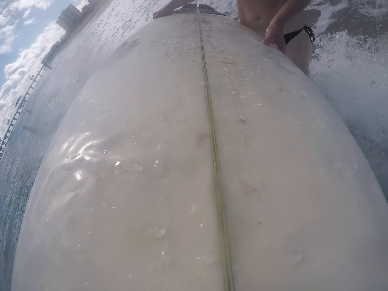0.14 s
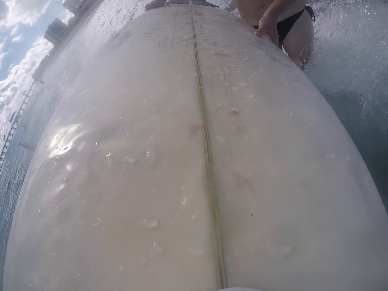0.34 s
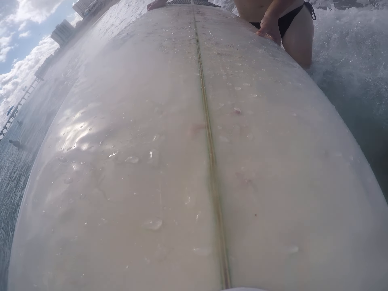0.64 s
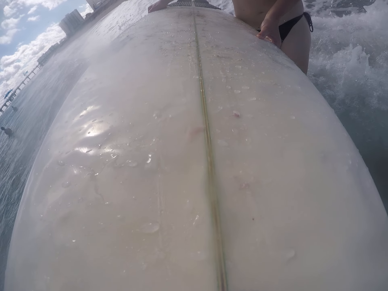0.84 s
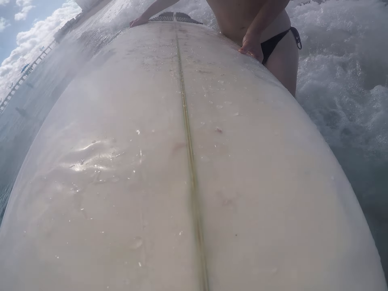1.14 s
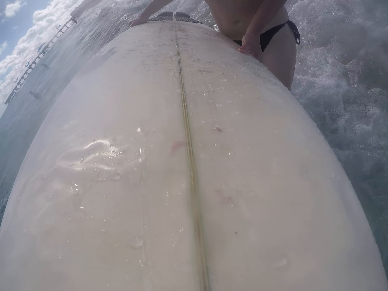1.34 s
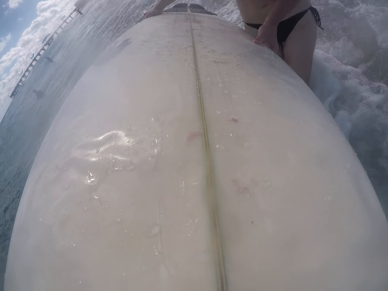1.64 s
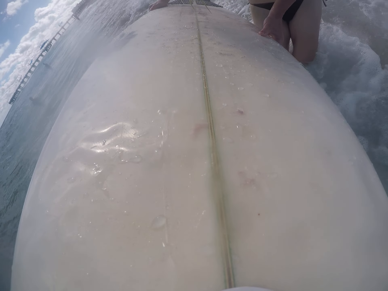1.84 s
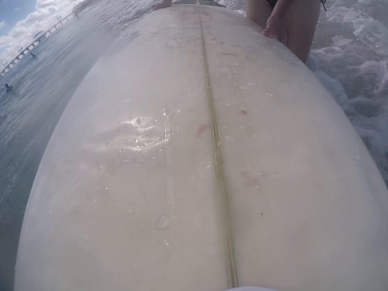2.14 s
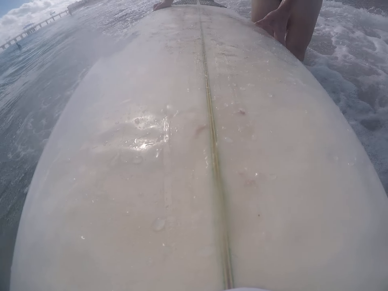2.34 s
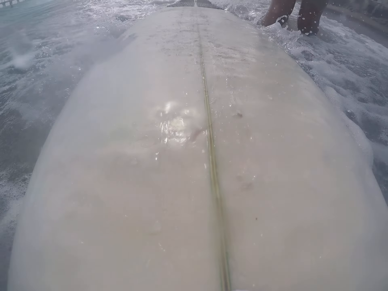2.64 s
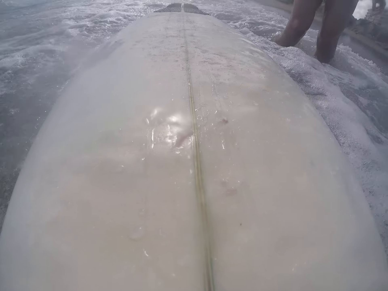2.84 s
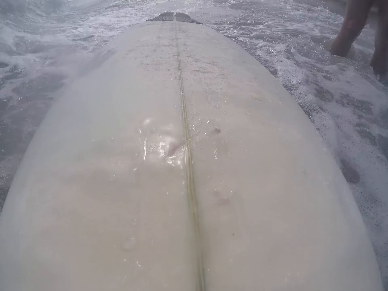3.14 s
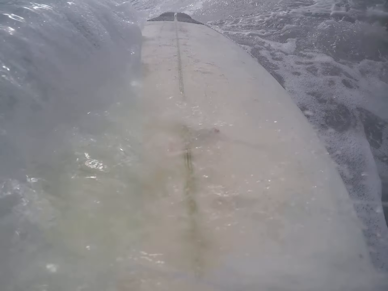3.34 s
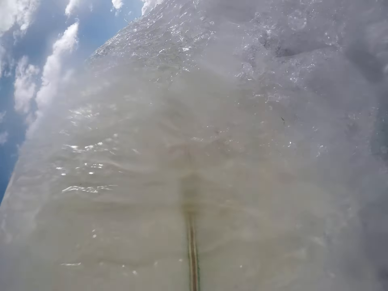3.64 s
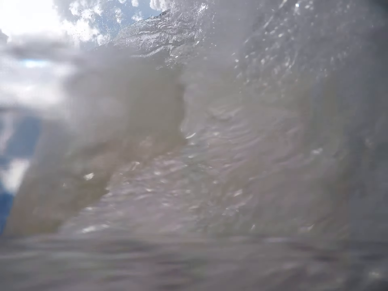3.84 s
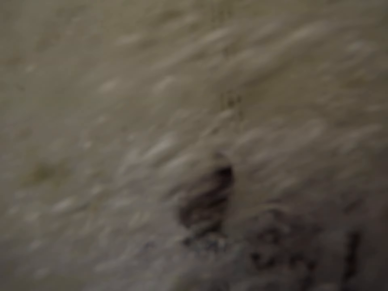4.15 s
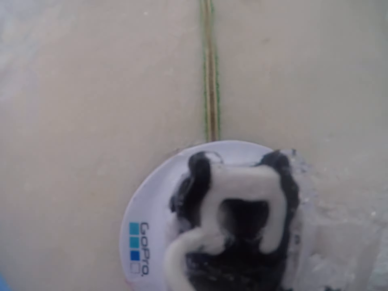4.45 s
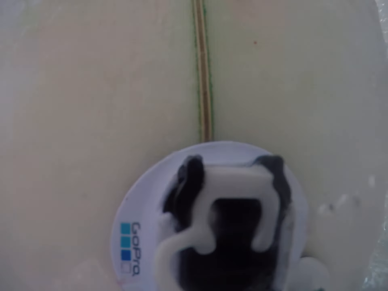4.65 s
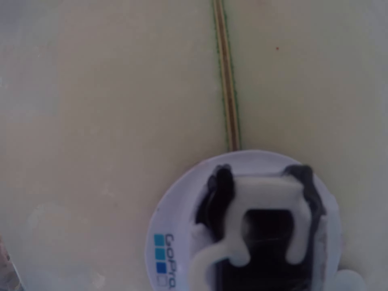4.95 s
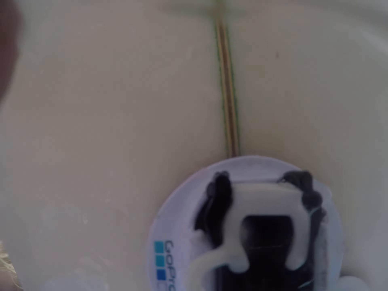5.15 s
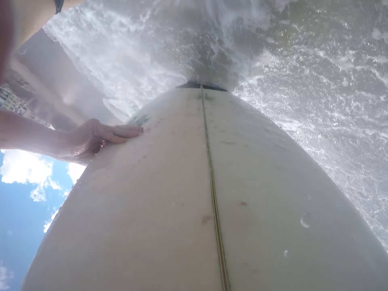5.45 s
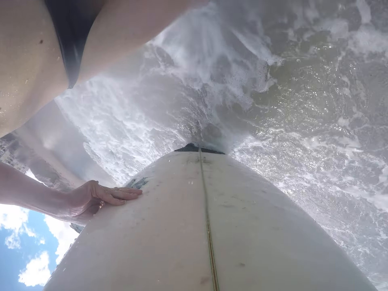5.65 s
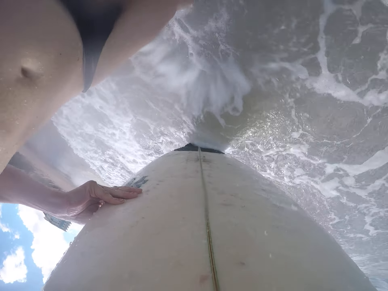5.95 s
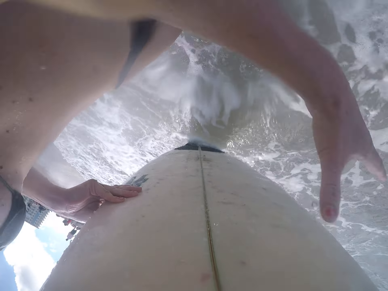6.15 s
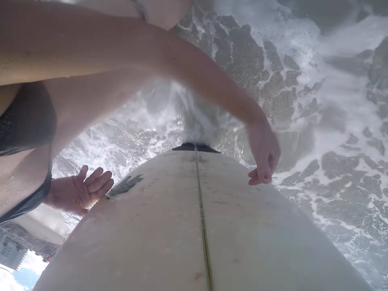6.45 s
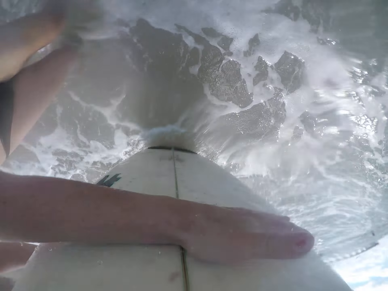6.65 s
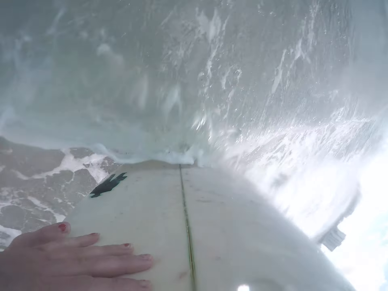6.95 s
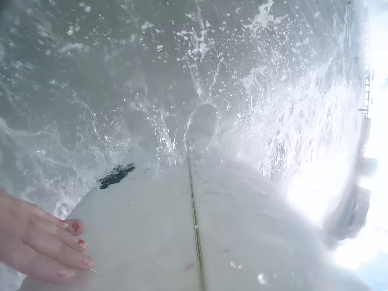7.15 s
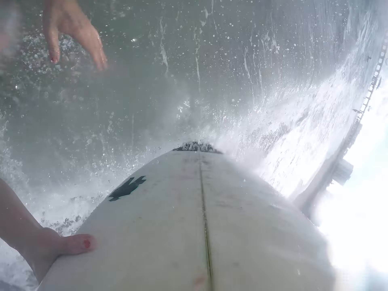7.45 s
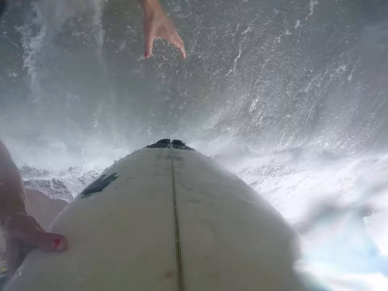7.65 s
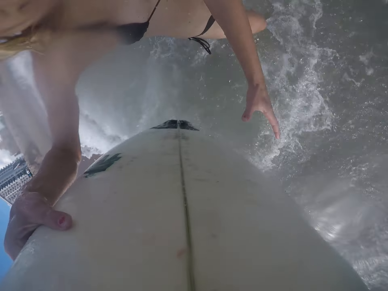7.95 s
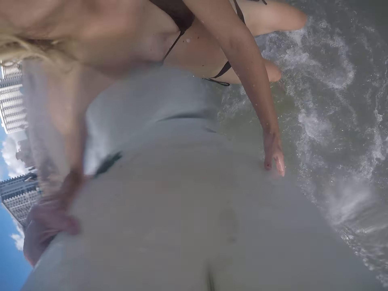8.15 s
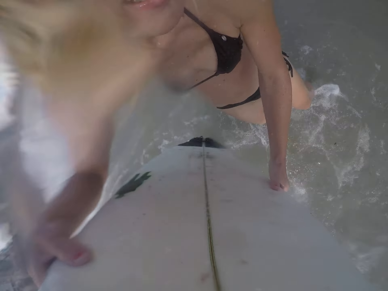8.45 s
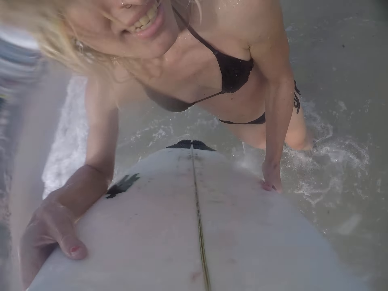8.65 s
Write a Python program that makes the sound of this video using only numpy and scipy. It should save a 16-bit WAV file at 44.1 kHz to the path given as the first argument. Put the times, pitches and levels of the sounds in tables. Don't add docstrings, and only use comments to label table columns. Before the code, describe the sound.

Close, muffled sound inside a sealed camera housing fixed to a surfboard in shore break. A broad roar fades within a second into low booming and sloshing. Water slaps the deck, then a heavy dunking thuds and gurgles. A rapid rocking rattle, short squeak and soft creak follow, then scrapes, hollow slaps, glugs and light ticking as hands hold the board upright.

```python
import sys
import numpy as np
from scipy import signal
from scipy.fft import rfft, irfft
from scipy.io import wavfile
from scipy.ndimage import uniform_filter1d, minimum_filter1d

SR = 44100
rng = np.random.default_rng(int(sys.argv[2]) if len(sys.argv) > 2 else 0)


def inscribe(sig):
    pcm = np.round(np.clip(np.atleast_2d(sig).T, -1, 1) * 32767)
    wavfile.write(sys.argv[1], SR, pcm.astype(np.int16))


def attenuation_scalar(level_db):
    decades = np.asarray(level_db, float) / 20
    return 10 ** decades


N = 387638

WETTED_S, LIFTED_S = 2.27, 5.7
# t/s, level/dB
ROAR_FADE = [
    (0, -9),
    (.25, -14.5),
    (.55, -21.5),
    (.85, -40),
    (1.1, -40.5),
    (1.25, -57.5),
    (1.5, -62),
]
# t/s, level/dB
LAPPING = [(0, -24.5), (.2, -28), (2.25, -34.5), (2.42, -37.5), (2.71, -43), (2.75, -54.5), (3.27, -50),
           (3.33, -30), (3.93, -33.5), (3.97, -41), (4.05, -30.5), (4.33, -32.5), (4.4, -47.5), (5.5, -46),
           (5.58, -47.5), (5.9, -43), (7.3, -34), (8.79, -36.5)]
# t/s, hold/s, scrape level/dB, hollow minus scrape level/dB
SURGES = [(2.28, 0.059, -19, 7.5), (2.497, 0.031, -13.5, 0.5), (2.56, 0.041, -14, 0.5),
          (2.628, 0.017, -26, -12), (2.654, 0.0066, -41, -19), (3.337, 0.0066, -7.5, 1),
          (3.424, 0.074, -25.5, -5), (3.793, 0.017, -22, 8), (3.847, 0.0095, -20.5, -11),
          (3.893, 0.033, -33, -16), (4.411, 0.57, -53.5, 16.5), (4.596, 0.21, -44.5, 12),
          (4.684, 0.038, -32.5, 10.5), (4.991, 0.018, -21.5, 6.5), (5.045, 0.0047, -14, -20),
          (5.066, 0.0069, -26, -1), (5.114, 0.039, -21, -19), (5.215, 0.089, -31, 4.5),
          (5.345, 0.17, -33.5, 1), (5.615, 0.0082, -29, 1), (2.721, 0.012, -47, 5.5),
          (2.329, 0.019, -30, 6)]
# t/s, hold/s, scrape level/dB, hollow minus scrape level/dB
GRABS = [(6.258, 0.043, -17.5, -17), (6.299, 0.029, -12.5, 1), (6.368, 0.079, -13, 1.5),
         (6.593, 0.0059, -27.5, 1.5), (6.625, 0.016, -12.5, -1), (6.749, 0.0094, -15, -2.5),
         (6.86, 0.087, -32, -1), (6.942, 0.12, -15.5, -12), (7.065, 0.039, -18, -4),
         (7.131, 0.054, -21, -6.5), (7.173, 0.03, -19.5, -22), (7.433, 0.14, -22.5, -2),
         (7.54, 0.21, -20.5, -0.5), (7.966, 0.037, -32.5, -6), (8.049, 0.19, -19.5, -11),
         (8.196, 0.035, -13.5, -4.5), (8.271, 0.23, -31, 2), (7.81, 0.071, -40, -5),
         (8.373, 0.028, -23.5, 7), (8.417, 0.031, -13.5, -5.5), (8.48, 0.059, -15.5, -1),
         (8.594, 0.013, -40, -2), (8.648, 0.021, -20, -5), (8.68, .11, -25.5, -5.5),
         (8.529, .04, -15.5, -18)]


def unit(x):
    return x / np.sqrt(np.mean(x ** 2))


def curves(rows):
    s, *columns = np.transpose(rows)
    return [np.interp(np.arange(N) / SR, s, c) for c in columns]


def band(x, lo_hz, hi_hz, order=2):
    return signal.sosfilt(signal.butter(order, [lo_hz, hi_hz], "band", fs=SR, output="sos"), x)


def ring(x, modes):
    return sum((-1) ** k * attenuation_scalar(db) * signal.lfilter(*signal.iirpeak(hz, hz / width, SR), x)
               for k, (hz, width, db) in enumerate(modes))


def restless_ring(x, modes, spread_db, rate):
    return sum((-1) ** k * ring(x * attenuation_scalar(spread_db * walk(rate)), [mode])
               for k, mode in enumerate(modes))


def colour(x, tone):
    hz, db = np.transpose(tone)
    bins_hz = np.arange(1, N // 2 + 2) * SR / N
    return unit(irfft(rfft(x) * attenuation_scalar(np.interp(np.log(bins_hz), np.log(hz), db)), N))


def walk(rate):
    k = int(SR / rate)
    held = np.repeat(rng.standard_normal(N // k + 1), k)
    return unit(uniform_filter1d(uniform_filter1d(held, k), k)[:N])


def grains(rate, spread_db):
    chance = rng.random((3, N))
    size = attenuation_scalar(-spread_db * np.log(1 - chance[1])) * np.sign(chance[2] - .5)
    return unit((chance[0] < rate / SR) * size)


def impulses(rows, gain_db=0):
    out = np.zeros(N)
    s, db = np.transpose(rows)
    out[(s * SR).astype(int)] = attenuation_scalar(db + gain_db)
    return out


def spurts(starts):
    t = np.arange(SR // 100) / SR
    push = (1 - np.exp(-t / 0.0014)) ** 2 * np.exp(-t / 0.00099)
    return rng.standard_normal(N) * signal.fftconvolve(starts, push)[:N]


def spells(rows, under_db, release_db_per_s):
    attack_s = 0.0056
    t, power = np.arange(SR) / SR, attenuation_scalar(2 * under_db) * np.ones(N)
    for s, hold, db in rows:
        drained_db = release_db_per_s * np.maximum(t - attack_s - hold, 0)
        shape = np.minimum(t / attack_s, 1) * attenuation_scalar(db - drained_db)
        at = int(s * SR)
        power[at:at + SR] += shape[:N - at] ** 2
    return 10 * np.log10(power)


def roar():
    # f/Hz, level/dB per Hz
    roar_tone = [(25, -6), (110, -9.5), (205, 0), (290, -12.5), (760, -5.5), (1150, -21), (2300, -31),
                 (11000, -70.5)]
    # f/Hz, level/dB per Hz
    spray_tone = [(880, -40), (1500, 0), (2440, -5), (3870, -8), (6330, -30), (9170, -28), (11900, -64),
                  (20200, -120)]
    # f/Hz, width/Hz, level/dB
    spray_rings = [(1710, 46, -8), (2420, 580, 3), (3300, 91, -19.5), (6550, 300, -18)]
    cavities = [(122, 47, -7.0), (210, 52, 0), (396, 23, 8.0), (434, 50, 6.5), (554, 74, 0.5), (779, 18, 5.0)]
    s = np.arange(N) / SR
    wide = colour(rng.standard_normal(N) * attenuation_scalar(2.5 * walk(30)), roar_tone)
    hollow = unit(ring(wide, cavities))
    wide = unit(0.6 * wide + 0.83 * hollow) * attenuation_scalar(curves(ROAR_FADE)[0]) * (s < ROAR_FADE[-1][0])

    spray = colour(rng.standard_normal(N), spray_tone)
    spray = unit(spray + 2.0 * ring(spray, spray_rings))
    spray = spray * (attenuation_scalar(-39.0 - 29.0 * s) + attenuation_scalar(-57.5)) * (s < WETTED_S)
    mist_db = np.where(s < WETTED_S, -62, -95 + 22.0 * np.clip((s - LIFTED_S) / 0.25, 0, 1))
    mist = unit(band(rng.standard_normal(N), 6200, 11500, order=3)) * attenuation_scalar(mist_db)
    return wide, spray + mist


def sway(hz, wander, flutter_db):
    phase = 2 * np.pi * np.cumsum(hz * (1 + wander * walk(14))) / SR
    return np.sqrt(2) * np.sin(phase) * attenuation_scalar(flutter_db * walk(26))


def board():
    # t/s, flex f/Hz, flex level/dB, stir of the sea level/dB
    bending = [(0.0, 30.5, -30, -34.5), (1.0, 28.4, -18.5, -34), (1.13, 27.63, -11.5, -29),
               (2.15, 27.26, -19, -27), (2.5, 27.94, -15, -13.5), (2.76, 27.7, -13, -37),
               (3.13, 27.86, -18.5, -45.5), (3.67, 28.13, -11, -17), (3.88, 24.7, -26, -13),
               (3.97, 21.9, -23.5, -25), (4.36, 24.83, -31.5, -21.5), (4.6, 38.6, -41, -41.5),
               (4.99, 39.66, -27.5, -16), (5.7, 26.34, -34, -36.5), (6.14, 26.7, -36.5, -38.5),
               (6.49, 29.2, -16.5, -18), (6.83, 25.02, -15, -18), (8.79, 27.01, -14.5, -18.5)]
    # t/s, f/Hz, peak level/dB, t60/s
    thumps = [(0.049, 174, -22.5, 0.92), (1.025, 111, -10.5, 0.1), (1.065, 118.4, -9.5, 0.41),
              (1.418, 115.6, -13, 0.26), (2.13, 117, -19, 0.24), (2.294, 183, -3, 1.03),
              (2.291, 487, -14.5, 0.23), (2.511, 158, -7.5, 0.29), (2.57, 122, -5.5, 0.24),
              (3.336, 98.4, -3, 0.094), (3.347, 189, -12, 0.13), (3.81, 91.5, 2, 0.058),
              (3.87, 192, 3, 0.043), (3.932, 97, -1.5, 0.041), (4.043, 91.7, -8.5, 0.23),
              (4.238, 79.6, 1.5, 0.057), (4.329, 99.7, -10, 0.36), (4.625, 126, -10, 0.51),
              (4.735, 130, -14.5, 0.83), (4.789, 91.7, -10.5, 0.42), (5.002, 99, -13, 0.37),
              (6.313, 111, -11, 1), (6.633, 103, -3.5, 0.14), (6.971, 115, -11, 0.18),
              (7.07, 159, -9, 0.17), (7.62, 118.7, -13.5, 1.06), (7.74, 118.4, -10.5, 0.74),
              (8.199, 94.2, -12.5, 0.66), (8.419, 153, -12, 0.2), (8.641, 112, -17, 1.1),
              (4.99, 67.2, -4, 0.27), (5.002, 42.7, -6, 0.53), (5.223, 62.5, -18.5, 0.31),
              (6.792, 67, -20, 0.39), (5.615, 58.3, -17, 0.26), (2.515, 69.4, -5, 0.15),
              (2.586, 69.3, -6.5, 0.29), (2.542, 110, -7, 0.09), (5.291, 59.1, -22, 0.23),
              (3.834, 79, 3, 0.063), (3.384, 190, -25, 0.11), (4.146, 90, -14, 0.18),
              (6.756, 65, -1.5, .15), (7.965, 123.6, -16.5, 0.87), (8.54, 117.4, -9, 0.36),
              (8.359, 137.9, -14.5, 0.25), (8.738, 72, -7.5, 0.59), (0.054, 199.7, -22.5, 2.2)]
    twist_hz, boom_hz, drum_hz = 54.86, 107.2, 183
    far_churn_db, surge_churn_db = -5.5, -8.5
    partner_ratio, partner_db = 1.13, -18.5
    s = np.arange(N) / SR
    flex_hz, flex_db, stir_db = curves(bending)
    afloat = s < LIFTED_S

    jolts = [(start, hold, db + surge_churn_db) for start, hold, db, _ in SURGES + GRABS]
    near_db = stir_db + np.where(afloat, -10.5, -27)
    under_db = np.where(s < WETTED_S, curves(LAPPING)[0] + far_churn_db, near_db)
    churn_db = spells(jolts, under_db, release_db_per_s=147.5)
    slosh = unit(band(rng.standard_normal(N), 33, 70)) * attenuation_scalar(4.0 * walk(9))
    stir = rng.standard_normal(N) * attenuation_scalar(3.04 * walk(12))
    upper = ring(stir, [(boom_hz, 14, 0), (drum_hz, 14, -5)])
    churn = unit(band(upper + attenuation_scalar(-15) * stir, 84, 234, order=3))

    flex = sway(flex_hz, wander=0.012, flutter_db=np.where(afloat, 1.1, 2.6))
    twist = sway(twist_hz, wander=0.1197, flutter_db=2.0)
    out = attenuation_scalar(flex_db) * flex + attenuation_scalar(churn_db) * churn
    out = out + attenuation_scalar(stir_db) * (0.63 * twist + 0.69 * slosh)
    for start, hz, db, t60 in thumps:
        at = int(start * SR)
        t = np.arange(min(SR, N - at)) / SR
        fade = (1 - np.exp(-t * hz / 0.27)) * np.exp(-np.log(1000) * t / t60)
        fade /= 1 + (t / 0.23) ** 6
        tone = np.sin(2 * np.pi * hz * t)
        tone = tone + attenuation_scalar(partner_db) * np.sin(2 * np.pi * partner_ratio * hz * t)
        out[at:at + len(t)] += attenuation_scalar(db) * fade * tone
    return out


def effort():
    # t/s, hold/s, level/dB
    shakes = [(2.3, 0.077, -47), (2.51, 0.13, -49.5), (3.33, 0.17, -44.5), (3.56, 0.4, -48.5),
              (3.8, 0.022, -37), (3.855, 0.065, -42), (3.98, 0.38, -51.5), (4.998, 0.012, -39.5),
              (5.04, 0.0084, -36), (5.068, 0.0085, -46), (5.12, 0.045, -38), (5.22, 0.077, -46.5),
              (5.3, 0.21, -58), (5.617, 0.012, -41.5), (6.26, 0.21, -48.5), (6.63, 0.042, -42),
              (6.75, 0.039, -53), (6.945, 0.21, -51.5), (7.07, 0.145, -67), (7.3, 0.12, -76),
              (7.42, 0.37, -54), (7.8, .3, -63), (8.1, 0.061, -56), (8.18, 0.091, -44.5),
              (8.38, 0.086, -47.5), (8.49, 0.1, -43), (8.69, 0.05, -68), (2.56, 0.096, -50),
              (8.772, .02, -36)]
    s, (lap_db,) = np.arange(N) / SR, curves(LAPPING)
    start, hold, db, hollow_db = np.transpose(SURGES + GRABS)
    deep_db = np.where(s < WETTED_S, 7.5, np.where(s < LIFTED_S, 1.5, -3))
    return (spells(zip(start, hold, db), lap_db, release_db_per_s=549.5),
            spells(zip(start, hold, db + hollow_db), lap_db + deep_db, release_db_per_s=404),
            spells(shakes, lap_db - 23.5, release_db_per_s=797))


def skin(force):
    # f/Hz, width/Hz, level/dB
    afloat_modes = [(383.4, 36.5, 0.5), (480, 91, -2.5), (560, 55, -3.5), (758, 78, -5), (925, 48, -6.5),
                    (1132, 84, 2.5), (1337, 53, -0.5)]
    # f/Hz, width/Hz, level/dB
    upright_modes = [(300, 30.6, 3.5), (483.4, 21.6, 4), (550, 105, -4.5), (800, 74, 1.5), (987, 93, 2),
                     (1228, 67, 5), (1333, 69, -1.5)]
    s = np.arange(N) / SR
    lifted = np.clip((s - LIFTED_S) / 0.095, 0, 1)
    load_db = np.where(s > WETTED_S, 1.8, 1.1)
    afloat = restless_ring(force, afloat_modes, load_db, 35)
    upright = restless_ring(force, upright_modes, load_db, 35)
    body = (1 - lifted) * afloat + lifted * upright + attenuation_scalar(-12.5) * force
    body = band(body, 180, 1570, order=3)
    body = signal.sosfilt(signal.cheby2(4, 30, 2100, fs=SR, output="sos"), body)
    return body + attenuation_scalar(-19 - 1.78 * lifted) * band(force, 1078.0, 1950.0)


def knocks():
    slips = np.diff(np.floor(np.cumsum(125 * attenuation_scalar(2.7 * walk(60))) / SR), prepend=0)
    return unit(spurts(slips * attenuation_scalar(4.9 * walk(300))))


def shell(force):
    # f/Hz, width/Hz, level/dB
    shell_modes = [(3020, 570, -4.5), (4500, 1100, 1), (6770, 2750, -2.5), (8420, 570, 5), (9900, 1500, -5),
                   (12500, 3000, -28.5)]
    body = restless_ring(force, shell_modes, 2.3, 120) + attenuation_scalar(-17.0) * force
    return band(signal.lfilter(*signal.iirnotch(3600, 3.5, SR), body), 2300, 7030, order=3)


def slaps():
    # t/s, peak level/dB, trapped-air f/Hz
    deck_slaps = [(2.292, 0.5, 450), (2.509, -6, 550), (3.33, -3.5, 1106), (3.472, -7.5, 823),
                  (3.805, 4.5, 367), (3.873, 10, 273), (4.241, -12.5, 430), (4.301, -8, 406),
                  (2.683, -12, 580), (5.003, 3, 425.4), (5.079, -8.5, 432), (5.24, -14, 1276),
                  (5.6205, -16, 1205), (5.6295, -13, 1392), (6.263, -18, 1064), (6.304, -4, 508),
                  (6.375, -9, 560), (6.632, 6, 292.5), (6.763, -0.5, 1256), (6.954, 0.5, 1060),
                  (7.113, -2.5, 773), (7.443, -3.5, 1256), (7.702, 0, 1068), (7.817, -6.5, 1050),
                  (7.851, -10, 1017), (8.055, -4.5, 1020), (8.208, 4.5, 1045), (8.377, -4, 1100),
                  (8.423, 4.5, 1010), (8.598, -1.5, 1050), (8.653, -5, 1085)]
    # t/s, peak level/dB
    palm_rubs = [
        (7.874, -34),
        (7.889, -23.5),
        (7.937, -32),
        (7.967, -18),
        (7.999, -18),
        (8.027, -13.5),
        (8.073, -25),
        (8.092, -12),
        (8.103, -23),
    ]
    rub_hz, rub_db = 1050, 4
    force, air = np.zeros((2, N + SR))
    t = np.arange(SR // 10) / SR
    rise = 1 - np.exp(-t / 0.0018)
    for s, peak_db, hz in deck_slaps + [(s, db + rub_db, rub_hz) for s, db in palm_rubs]:
        at = slice(int(s * SR), int(s * SR) + len(t))
        plop = np.sin(2 * np.pi * hz * t * (1 + 1.26 * t)) * np.exp(-t / 0.0063)
        force[at] += attenuation_scalar(peak_db) * rise * np.exp(-t / 0.0046)
        air[at] += attenuation_scalar(peak_db - 5.5) * rise * plop
    return rng.standard_normal(N) * force[:N], air[:N]


def wash():
    # t/s, peak level/dB
    drops = [(0.0902, -24), (2.308, -31.5), (2.323, -26), (2.5144, -30), (2.577, -24), (2.6172, -22.5),
             (2.6594, -28.5), (2.7138, -41.5), (3.3403, -30), (3.3436, -27), (3.384, -23), (3.4274, -24.5),
             (3.4808, -39), (3.503, -41), (3.5352, -24.5), (3.7484, -33), (3.81, -18), (3.835, -43.5),
             (3.8607, -17.5), (3.8718, -9.5), (4.052, -31), (4.0732, -31), (4.1415, -54), (4.233, -34),
             (4.7674, -42), (5.0045, -32), (5.0489, -31), (5.0751, -26.5), (5.1208, -41), (5.238, -27),
             (5.2657, -20), (5.447, -33), (5.5059, -29), (5.6197, -31), (5.629, -35), (6.3759, -32.5),
             (6.631, -35), (6.64, -21), (6.6794, -21.5), (6.7433, -31), (6.7624, -12.5), (6.814, -37),
             (6.8633, -33), (6.9488, -31), (7.095, -21.5), (7.1428, -30), (7.1828, -23), (7.221, -25),
             (7.3853, -32), (8.1868, -31.5), (8.207, -32), (8.2612, -31.5), (8.4163, -34), (8.4956, -27),
             (8.5957, -33), (8.6908, -32.5), (8.762, -35)]
    scrape_db, hollow_db, shake_db = effort()
    wet = np.arange(N) / SR > WETTED_S
    stutter_db = np.where(wet, 1.6, .8) * walk(45) + np.where(wet, 2.2, .6) * walk(160)
    grainy = wet * np.clip((scrape_db + 49.5) / 14, 0, 1) * 0.43
    flow = 0.35 * rng.standard_normal((2, N))
    flow = flow + grainy * np.array([grains(2500, 2.96), grains(1500, 2.64)])

    slap, air = slaps()
    low, high = (signal.butter(2, 680, kind, fs=SR, output="sos") for kind in ("low", "high"))
    force = signal.sosfilt(high, attenuation_scalar(scrape_db + stutter_db) * flow[0])
    force = force + attenuation_scalar(1.5) * signal.sosfilt(low, attenuation_scalar(hollow_db + stutter_db) * flow[1])

    loose = wet * np.clip((shake_db + 57) / 10, .1, .7)
    chatter = np.sqrt(1 - loose ** 2) * rng.standard_normal(N) + loose * knocks()
    chatter = attenuation_scalar(-0.5 + shake_db + loose * stutter_db) * chatter
    chatter = chatter + attenuation_scalar(14.5) * spurts(impulses(drops))
    return attenuation_scalar(17.5) * skin(force + attenuation_scalar(-9.5) * slap) + air + attenuation_scalar(8.0) * shell(chatter)


def glugs():
    # t/s, f/Hz, length/s, level/dB
    air_pockets = [(.6, 184.6, 0.26, -31.5), (3.46, 157, 0.052, -22.5), (3.67, 164.7, 0.16, -23),
                   (4.312, 490, 0.013, -23.5), (4.69, 560, 0.051, -29.5), (4.992, 446, 0.069, -17.5),
                   (5.855, 282, 0.023, -31.5), (6.197, 300, 0.023, -25.5), (6.308, 314, 0.05, -17),
                   (6.407, 309.7, 0.18, -17), (6.617, 300, 0.086, -14.5), (7.072, 249, 0.054, -13.5),
                   (7.451, 288, 0.29, -28), (7.643, 800, 0.029, -18.5), (8.551, 268, 0.035, -12.5),
                   (8.592, 282.5, 0.044, -15), (8.64, 290.7, 0.1, -17.5), (8.704, 275, 0.075, -21.5),
                   (0.037, 550, 0.18, -28.5), (0.244, 560, 0.057, -26.5), (0.271, 378, 0.35, -26.5),
                   (0.639, 375.3, 0.33, -27.5), (3.345, 341.4, 0.058, -19), (3.39, 364, 0.2, -34),
                   (3.564, 378, 0.045, -29.5), (3.688, 372, 0.27, -27.5), (3.5, 166.5, 0.038, -19),
                   (4.013, 399, 0.082, -39), (4.09, 473, 0.015, -24), (4.184, 1230, 0.013, -25.5),
                   (4.227, 430, 0.031, -39), (4.711, 430, .05, -42), (6.296, 1180, 0.023, -19),
                   (6.373, 560, 0.097, -15), (6.381, 1254, 0.13, -17.5), (6.452, 456, 0.11, -24),
                   (6.5, 800, 0.033, -40), (7.5, 491, 0.28, -33.5), (7.532, 960, 0.085, -17.5),
                   (7.607, 800, 0.013, -11), (7.644, 272, 0.046, -24), (7.703, 300, 0.12, -23),
                   (7.73, 484, 0.038, -23.5), (8.217, 327, 0.083, -26), (8.298, 243, 0.21, -29.5),
                   (8.419, 305, 0.11, -22), (8.494, 257.6, 0.11, -20), (6.875, 300, 0.054, -29.5),
                   (5.075, 430, 0.02, -24.5), (5.048, 1290, 0.0049, -13), (5.073, 1316, 0.025, -21),
                   (4.716, 560, 0.026, -21.5)]
    out, waver = np.zeros(N), walk(70)
    for s, hz, length, db in air_pockets:
        t = np.arange(min(int(length * SR), N - int(s * SR))) / SR
        at = slice(int(s * SR), int(s * SR) + len(t))
        phase = 2 * np.pi * np.cumsum(hz * (1 + 0.021 * waver[at])) / SR
        swell = np.sin(np.pi * (t / length) ** 0.48)
        out[at] += attenuation_scalar(db + 1.85 * waver[at]) * swell * np.sin(phase)
    return out


def clatter():
    # t/s, peak level/dB
    latch_ticks = [(6.7033, -46), (6.7491, -40), (6.778, -36), (7.0434, -42), (7.0826, -41),
                   (7.0875, -37.5), (7.1109, -28), (7.1528, -41), (7.1999, -35.5), (7.2346, -40),
                   (8.2303, -27.5), (8.2542, -37), (8.2814, -42.5), (8.4073, -34.5), (8.4128, -36.5),
                   (8.4578, -33.5), (8.4682, -37.5), (8.5083, -25), (8.5219, -26.5), (8.5434, -31.5),
                   (8.5799, -31.5), (8.6141, -34.5), (8.6298, -42), (8.7054, -39), (8.7114, -34),
                   (8.719, -36.5), (8.7261, -36.5), (8.7359, -36), (8.7425, -37), (8.7502, -30),
                   (8.7553, -41), (8.768, -34.5),
                   (2.5863, -35),
        (2.6099, -26),
        (3.502, -27.5),
        (3.528, -35),
        (3.8817, -24.5),
        (5.0834, -33),
    ]
    # t/s, peak level/dB
    housing_taps = [
        (0.0937, -30),
        (3.875, -16.5),
        (3.9738, -44),
        (5.6222, -23.5),
        (5.631, -23),
    ]
    # f/Hz, width/Hz, level/dB
    latch_modes = [(5640, 700, -6.5), (6700, 600, 3.5), (7940, 700, 1)]
    ticks = impulses(latch_ticks, 26)
    taps = impulses(housing_taps, 26)
    latch = sum(ring(spurts(ticks), [mode]) for mode in latch_modes)
    return band(latch, 4600, 9000, order=4) + band(spurts(taps), 850, 2300)


def bright_clicks():
    # t/s, peak level/dB
    snaps = [
        (2.615, -39.5),
        (3.8108, -30.5),
        (3.861, -38),
        (3.873, -38.5),
        (8.781, -26.5),
        (8.785, -21),
        (6.7635, -44),
    ]
    return band(spurts(impulses(snaps, 6.5)), 9000, 17000)


def rocking():
    # t/s, jolts f/Hz, level/dB
    jolts = [
        (4.62, 59.58, -66),
        (4.64, 58.4, -20),
        (4.78, 44.1, -21.5),
        (4.85, 46.6, -22.5),
        (4.93, 48.6, -23),
        (4.985, 45.84, -33),
        (5.0, 47.3, -51),
    ]
    hz, db = curves(jolts)
    phase = 2 * np.pi * np.cumsum(hz) / SR
    stack = sum(attenuation_scalar(fall_db) * np.cos(k * phase) for k, fall_db in enumerate([3.5, -8.0, -3.0, -15], 1))
    puffs = rng.standard_normal(N) * np.exp(3.0 * np.cos(phase))
    hollow = unit(ring(puffs, [(430, 21, 1.0), (560, 29, -0.5), (762, 26, -6)]))
    s = np.arange(N) / SR
    return (stack + attenuation_scalar(-18) * hollow) * attenuation_scalar(db) * (s > jolts[0][0]) * (s < jolts[-1][0])


def hinge():
    # t/s, slips f/Hz, level/dB
    squeak = [
        (5.12, 800, -45),
        (5.13, 869, -25),
        (5.142, 865, -15),
        (5.15, 899, -25),
        (5.153, 643, -23),
        (5.165, 615.5, -22.5),
        (5.182, 465, -24),
        (5.19, 450, -71),
    ]
    # t/s, slips f/Hz, level/dB
    creak = [
        (5.341, 270, -46),
        (5.37, 255.4, -40),
        (5.398, 245.8, -70),
        (5.419, 230, -43),
        (5.471, 263, -30.5),
        (5.5, 245, -35),
        (5.54, 226, -41.5),
        (5.556, 255, -84),
    ]
    hz, db = curves(squeak + creak)
    phase = np.cumsum(hz * (1 + .008 * walk(250))) / SR
    slips = np.diff(np.floor(phase), prepend=0) * attenuation_scalar(1.5 * walk(500))
    grit = .022 * rng.standard_normal(N) * np.exp(-(phase % 1) / .3)
    s = np.arange(N) / SR
    sounding = (s > squeak[0][0]) * (s < creak[-1][0])
    return unit(band(slips + grit, 420, 1600, order=4)) * attenuation_scalar(db) * sounding


def scene():
    roar_leans, spray_wide_db = 0.12, -31
    wide, spray = roar()
    middle = board() + wash() + glugs() + clatter() + bright_clicks() + rocking() + hinge()
    middle = middle + spray - roar_leans * wide
    late_spray = np.roll(spray, SR // 50) * (np.arange(N) / SR < ROAR_FADE[-1][0])
    wide = wide + attenuation_scalar(spray_wide_db) * late_spray
    return np.array([middle + wide, middle - wide])


def band_limit(x):
    return signal.sosfilt(signal.butter(12, 15700, fs=SR, output="sos"), x)


def record(dry):
    span = SR // 300
    gain = np.minimum(1, .98 / (np.abs(dry).max(axis=0) + 1e-9))
    gain = uniform_filter1d(minimum_filter1d(gain, span), span)
    return band_limit(dry * gain)


dry = scene()
out = record(dry)
inscribe(out)
```